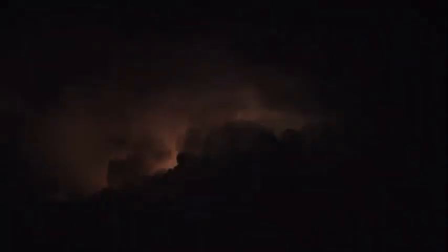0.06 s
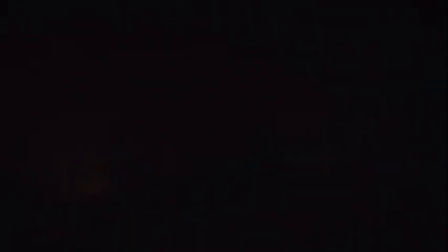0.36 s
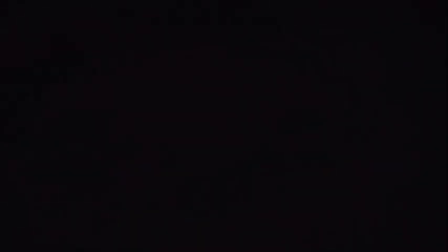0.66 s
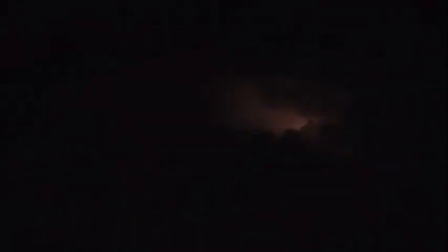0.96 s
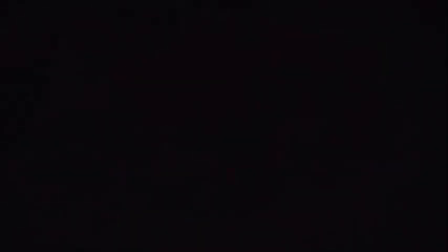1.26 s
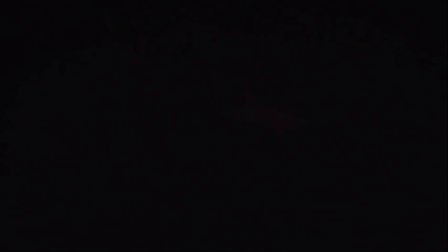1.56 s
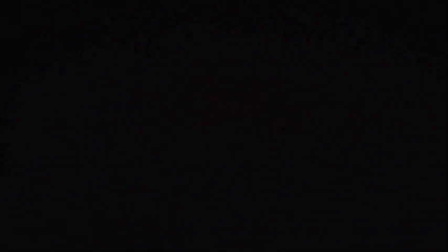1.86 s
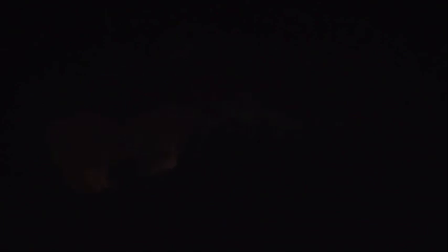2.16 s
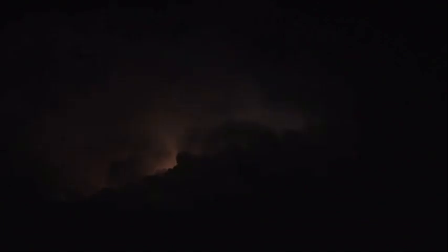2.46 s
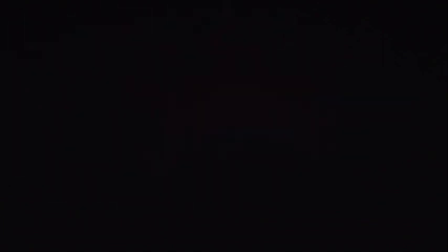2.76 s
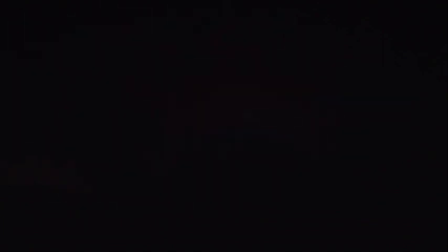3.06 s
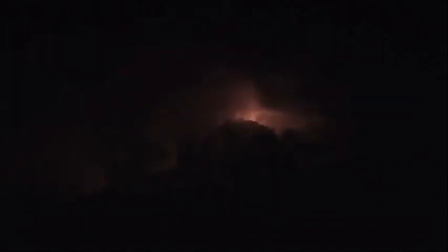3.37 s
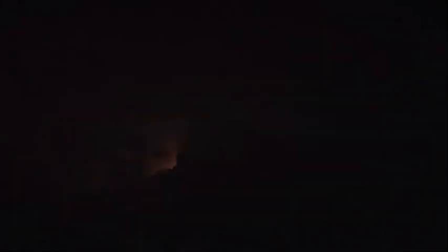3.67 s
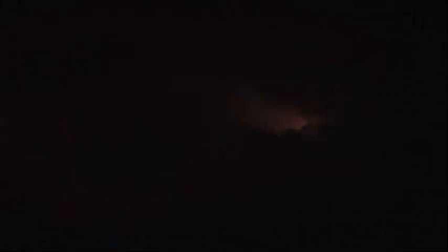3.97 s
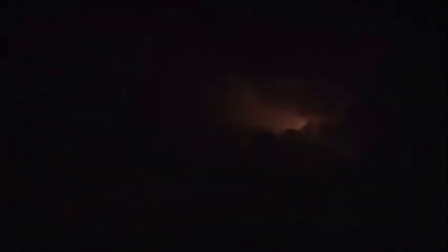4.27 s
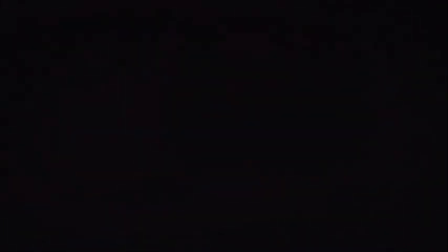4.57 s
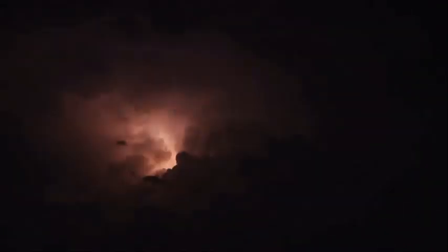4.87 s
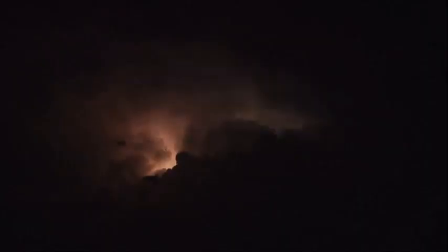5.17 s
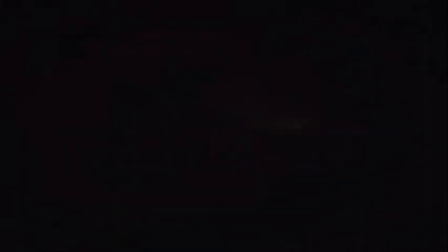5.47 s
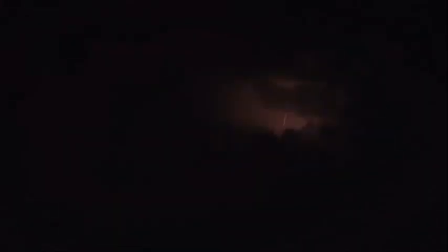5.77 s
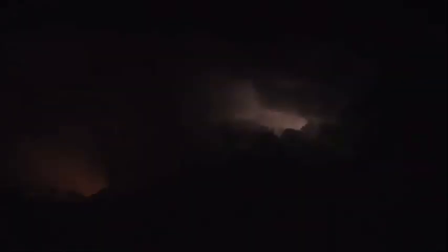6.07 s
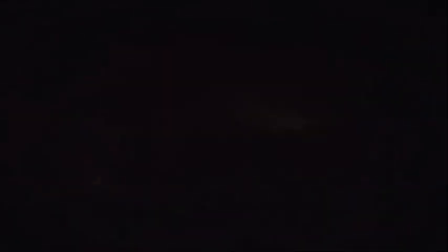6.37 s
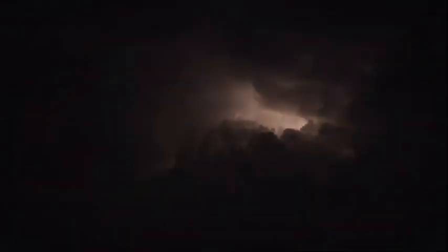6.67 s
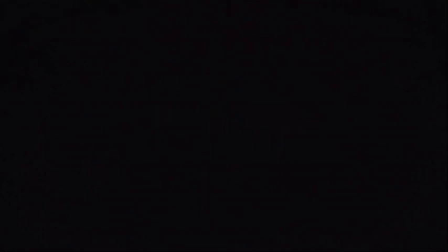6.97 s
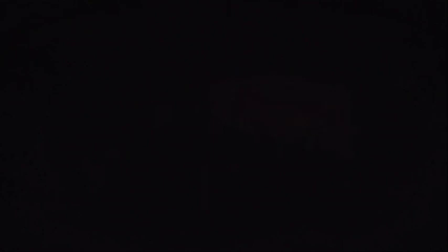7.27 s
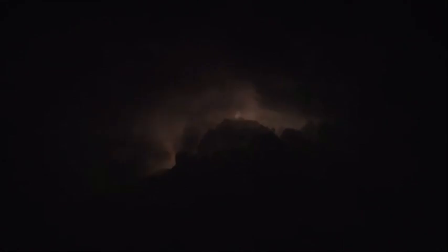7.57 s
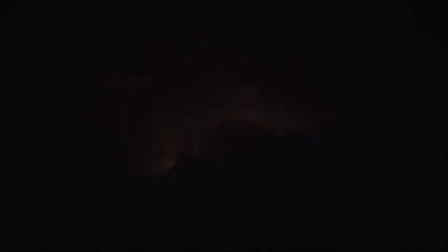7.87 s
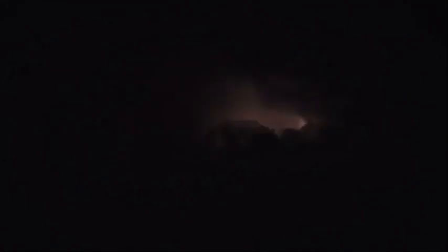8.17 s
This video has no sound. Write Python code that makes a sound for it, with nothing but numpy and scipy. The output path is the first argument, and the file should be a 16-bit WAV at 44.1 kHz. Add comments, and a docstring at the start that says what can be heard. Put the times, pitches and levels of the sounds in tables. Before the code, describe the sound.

Outdoors in a night storm, thunder rumbles low over a soft, gusty hiss of distant rain and wind. About two seconds in, a sudden loud clap slightly overloads the microphone and runs on in heavy booms. The sound cuts out for a moment, with a click at each edge. The thunder returns, swells again and rolls on more quietly, with one small tick near the end.

```python
"""Thunder in a night storm

A low rumble, a sudden clap that overloads the microphone, then a long roll on which peals swell and
fade: shock waves from the lightning channel, dulled by kilometres of air. Behind it lies a gusty wash
of distant rain and wind. The recorder's gain ducks at the clap and creeps back. The sound cuts out
once for a moment, with a click at each edge, and ticks once more near the end."""
import sys
import numpy as np
from scipy import signal
from scipy.fft import rfft, irfft
from scipy.io import wavfile
from scipy.ndimage import uniform_filter1d, minimum_filter1d

SR = 44100
rng = np.random.default_rng(int(sys.argv[2]) if len(sys.argv) > 2 else 0)


def wav_out(sig):
    """Save sig, one row per channel (or a flat mono array), as 16-bit PCM at SR to the path in sys.argv[1]."""
    wavfile.write(sys.argv[1], SR, np.round(np.clip(np.atleast_2d(sig).T, -1, 1) * 32767).astype(np.int16))


N = 371763
TIME = np.arange(N) / SR
FREQS = np.maximum(np.arange(N // 2 + 1) * SR / N, 1)

# how alike left and right are: f/Hz, correlation
STEREO_LIKENESS = [(60, 0.98), (150, 1), (300, 0.96), (520, 0.87), (900, 0.71), (1500, 0.49), (2500, 0.035),
                   (4000, -0.085), (8000, -0.26), (12000, .6)]
# fader of the rain and wind between gusts: t/s, relative level/dB
WASH_FADER = [(0, -52), (0.65, -51.5), (1.6, -49), (2.05, -49), (2.3, -50.5), (3.1, -49), (4.5, -48.5),
              (5.3, -47), (6.5, -46.5), (8.4, -47)]
# gusts and lulls: t/s, lift/dB, half width/s
WASH_GUSTS = [(0.13, 3.5, 0.12), (0.49, 2.7, 0.042), (0.58, -1, 0.03), (0.97, 2, 0.045), (1.5, 1, 0.06),
              (1.725, 2.5, 0.031), (2.11, 3.8, 0.026), (4.5, -2.5, 0.079), (7.53, 1.3, 0.034),
              (7.82, 0.8, 0.055)]
# tone of the wash: f/Hz, relative level/dB
WASH_EQ = [(100, -2.5), (400, 14), (800, 16), (1200, 13), (1600, 9), (2000, 4.5), (2700, 0), (3700, -6.5),
           (5200, -9), (7000, -14.5), (10000, -20), (13000, -23.5), (15500, -30)]
# side the wash comes from: f/Hz, left minus right/dB
WASH_PAN = [(300, -3), (1200, -2), (2200, -2.5), (4000, 0)]
# fine hiss of nearer drops: t/s, treble lift/dB
DROP_SPARKLE = [(0, 1), (2, -0.1), (4.5, 0.9), (5.5, -3), (8.4, -1.5)]
# tone of thunder after kilometres of air: f/Hz, relative level/dB
THUNDER_EQ = [(15, -33), (25, -16), (38, -5), (58, 5.5), (100, -4), (125, 1.5), (215, 0.5), (270, -6),
              (340, -8.5), (420, -11), (680, -17.5), (1000, -27.5), (1200, -36), (1400, -43.5), (2200, -68),
              (4000, -88)]
# fader of the thunder's deep bass: t/s, relative level/dB
BASS_FADER = [(0, -27), (0.9, -31), (1.7, -29), (2.05, -30), (2.11, -20), (2.8, -17.5), (3.05, -20.5),
              (3.45, -17), (3.8, -18.5), (4.3, -21), (4.7, -25.5), (5.05, -19), (5.7, -19), (6.2, -21.5),
              (7, -27.5), (8.4, -27)]
# fader of its body, the roll under the peals: t/s, relative level/dB
BODY_FADER = [(0, -26), (0.78, -24), (1.7, -27.5), (2.06, -26), (2.125, -22), (2.15, -9.5), (2.9, -9.5),
              (3.72, -8), (3.97, -17.5), (4.7, -15), (5.1, -15), (5.8, -12.5), (6.2, -15.5), (7.0, -17),
              (7.5, -20.5), (8.4, -22.5)]
# fader of its growl, the rough upper edge: t/s, relative level/dB
GROWL_FADER = [(0, -35.5), (1.7, -35.5), (2.125, -29), (2.18, -12), (2.33, -10), (2.8, -11.5), (3.3, -12),
               (3.95, -18), (4.6, -17.5), (5.7, -22.5), (6.3, -24.5), (7.2, -25.5), (7.7, -30.5),
               (8.4, -29)]
# peals, one per lightning branch: t/s, length/s, body lift/dB, bass lift/dB, growl lift/dB
BRANCH_PEALS = [(0.17, 0.06, 0.5, 2, -2), (0.27, 0.054, 3, 4, 5), (0.497, 0.033, 3, 4, 8.5),
                (0.603, 0.098, 3.5, 5.5, 1), (0.91, 0.07, -0.5, 0.5, 1), (1.13, 0.12, 2, 4, 0),
                (1.828, 0.088, 2, 2, 6), (2.084, 0.011, 6.5, 3, -4), (2.13, 0.083, 4, 6, -0.5),
                (2.327, 0.071, 4.5, -1.5, -2), (2.438, 0.059, 5, 5.5, 1), (2.574, 0.23, 6, 3, 1.5),
                (2.98, 0.11, 5, 2, 2.5), (3.211, 0.075, 1, 2, 1.5), (3.408, 0.075, 5.5, 6, 3),
                (3.535, 0.069, 1, -3, 0.5), (4.248, 0.03, 6, 4, 3), (4.405, 0.11, 5.5, 4.5, 1.5),
                (4.816, 0.096, 4.5, -0.5, -0.5), (4.928, 0.071, 5.5, 0, 0.5), (5.023, 0.023, 4, 6, 1.5),
                (5.106, 0.046, 3.5, 4.5, 0.5), (5.195, 0.09, 1, 4, -2), (5.421, 0.073, 6, 9, 5.5),
                (5.506, 0.06, 4, 5.5, 3), (5.59, 0.064, 4, 0, 3), (5.868, 0.083, 1.5, 7.5, 2.5),
                (5.994, 0.071, 9.5, 8, 3.5), (6.68, 0.032, -1, 3, 3), (6.77, 0.059, 1.5, 2, 0.5),
                (6.893, 0.026, 1, 2, 4.5), (6.99, 0.094, 1, 2, 1.5), (7.153, 0.04, 3, 6, 1),
                (7.538, 0.023, 2.5, 4.5, 1), (7.789, 0.05, 3.5, -3, 2.5)]
# strong shocks that stand out of the roll: t/s, dry peak level/dB, f/Hz, half width/s
SHOCK_BOOMS = [(0.335, -13, 170, 0.0034), (0.522, -8.5, 169, 0.0035), (0.535, -10.5, 174, 0.0065),
               (0.655, -13.5, 138, 0.0077), (2.142, 5, 206, 0.0076), (2.17, 0, 177, 0.0049),
               (2.186, 0, 210, 0.005), (2.229, 1.5, 170, 0.0099), (2.29, 2.5, 196, 0.0045),
               (2.33, 2, 204, 0.0056), (2.364, 5, 183, 0.0042), (2.464, 3.5, 165, 0.0074),
               (2.611, 5.5, 150, 0.0085), (2.663, 5, 194, 0.0047), (2.722, 4.5, 183, 0.0059),
               (2.786, 5.5, 165, 0.005), (2.823, 4, 152, 0.0057), (3.011, 6, 152, 0.0048),
               (3.05, 4, 190, 0.007), (3.131, 1, 149, 0.0078), (3.229, 4, 224, 0.0038),
               (3.335, 7.5, 144, 0.0092), (3.436, 5.5, 137, 0.0089), (3.479, 2, 150, 0.011),
               (3.634, 4.5, 166, 0.0053), (3.676, 3, 147, 0.008), (3.702, 2.5, 208, 0.0024),
               (3.737, 0, 151, 0.0064), (3.78, 2.5, 213, 0.0016), (3.829, 8, 158, 0.0064),
               (4.269, 1.5, 130, 0.0089), (4.443, 1.5, 170, 0.0051), (4.848, 1.5, 169, 0.0046),
               (4.972, 2.5, 167, 0.0039), (5.044, 3, 145, 0.0043), (5.289, -2, 160, 0.009),
               (5.421, 1.5, 175, 0.0046), (5.443, 0, 197, 0.01), (5.47, 0, 199, 0.018),
               (5.514, 0, 125, 0.006), (5.556, 3.5, 135, 0.005), (5.568, 3.5, 172, 0.0044),
               (5.626, -0.5, 192, 0.006), (5.877, 0.5, 185, 0.005), (5.923, -2.5, 170, 0.0077),
               (6.016, 3.5, 137, 0.009), (6.048, 4.5, 151, 0.015), (6.104, 0.5, 142, 0.0061),
               (6.271, -3, 171, 0.0084), (6.696, -5, 186, 0.0065), (7.081, -4.5, 168, 0.0094),
               (7.196, -5, 219, 0.0036), (7.39, -9, 218, 0.01), (7.848, -8.5, 142, 0.0072)]
# sharp clicks: t/s, step level/dB
CLICK_HITS = [(3.963, -17.5), (4.2634, -9.5), (8.3836, -15)]

WASH_TRIM_DB, BASS_TRIM_DB, BODY_TRIM_DB, GROWL_TRIM_DB = 2, 0.55, 0.45, -1.5
BASS_EDGE_HZ, GROWL_EDGE_HZ, TEAR_EDGE_HZ = 102.5, 344.4, 1130
STEEPENING_DB_PER_DB, STEEPENING_FROM_DB = 0.25, -18
PEAL_ATTACK_S, PEAL_RELEASE_S, BASS_RELEASE_S = 0.039, 0.026, 0.1


def from_db(db):
    """Decibels to gain."""
    return 10 ** (np.asarray(db) / 20)


def over_time(points):
    """An automation curve read at every sample."""
    return np.interp(TIME, *np.transpose(points))


def over_hz(points):
    """A curve read at every frequency, on a log axis."""
    hz, value = np.transpose(points)
    return np.interp(np.log(FREQS), np.log(hz), value)


def below(edge_hz, order=6):
    """Low half of a crossover whose two halves add up in power."""
    return 1 / np.sqrt(1 + (FREQS / edge_hz) ** (2 * order))


def above(edge_hz):
    """High half of the same crossover."""
    return np.sqrt(1 - below(edge_hz) ** 2)


def smoothed(x, span_s, mode="reflect"):
    """Rounds off a control signal with two moving averages."""
    size = int(span_s * SR)
    return uniform_filter1d(uniform_filter1d(x, size, mode=mode), size, mode=mode)


def wavering(span_s):
    """A slow random wobble with a spread of 1."""
    slow = smoothed(rng.standard_normal(N), span_s, mode="wrap")
    return slow / slow.std()


def evened(x, span_s):
    """Holds the running rms at 1 and keeps the faster flutter."""
    power = smoothed(x.mean(0) ** 2, span_s)
    return x / np.sqrt(np.maximum(power, 1e-20))


def arrivals(per_s, spread_db):
    """Two trains of randomly timed pulses of uneven size and either sign."""
    hits = rng.random((2, N)) < per_s / SR
    signs = rng.choice([-1, 1], (2, N))
    return hits * signs * from_db(spread_db * rng.standard_normal((2, N)))


def at_microphones(pair, eq):
    """Colours two unrelated signals into left and right: long waves reach both microphones alike."""
    alike = np.clip(over_hz(STEREO_LIKENESS), -.99, .998)
    mid, side = rfft(pair) * eq
    side = side * np.sqrt((1 - alike) / (1 + alike))
    return irfft(np.array([mid + side, mid - side]), N)


def wash(flutter_db):
    """Countless far drops and rustling leaves merge into a soft, wide hiss that swells in gusts."""
    gusts_db = sum(db * np.exp(-((TIME - t) / width_s) ** 2) for t, db, width_s in WASH_GUSTS)
    level_db = over_time(WASH_FADER) + gusts_db + flutter_db * wavering(span_s=0.042)
    drops = arrivals(per_s=14000, spread_db=2.5)
    patter = at_microphones(drops, from_db(over_hz(WASH_EQ)))
    panned = rfft(patter) * from_db(over_hz(WASH_PAN) * [[.5], [-.5]])
    sparkle = irfft(panned * above(edge_hz=3900), N)
    hiss = irfft(panned, N) + sparkle * (from_db(over_time(DROP_SPARKLE)) - 1)
    # the fader sets the level of the treble, where the thunder does not reach
    treble = irfft(panned * above(edge_hz=2500), N)
    return hiss / treble.mean(0).std() * from_db(level_db + WASH_TRIM_DB)


def thunder():
    """Every kink of the lightning channel sends a shock; they overlap into a roll, dulled by the air."""
    body_lift, _, growl_lift = peal_lifts(PEAL_RELEASE_S)
    _, bass_lift, _ = peal_lifts(BASS_RELEASE_S)  # the bass of a peal lingers
    bass_db = over_time(BASS_FADER) + bass_lift
    body_db = over_time(BODY_FADER) + body_lift
    growl_db = over_time(GROWL_FADER) + growl_lift
    shocks = arrivals(per_s=2400, spread_db=2.0)
    air = from_db(over_hz(THUNDER_EQ))
    bass = evened(at_microphones(shocks, air * below(BASS_EDGE_HZ)), span_s=0.16)
    body = evened(at_microphones(shocks, air * above(BASS_EDGE_HZ) * below(GROWL_EDGE_HZ)), span_s=0.034)
    # the nearer parts of the channel keep more of their upper range
    growl = evened(at_microphones(shocks, air * above(GROWL_EDGE_HZ)), span_s=0.35)
    # strong shocks have steeper fronts, so a loud growl tears at the top
    tear = irfft(rfft(growl) * above(TEAR_EDGE_HZ), N)
    tear_db = STEEPENING_DB_PER_DB * np.maximum(growl_db - STEEPENING_FROM_DB, 0)
    growl = growl + tear * (from_db(tear_db) - 1)
    booming = with_booms(body * from_db(body_db + BODY_TRIM_DB))
    return bass * from_db(bass_db + BASS_TRIM_DB) + booming + growl * from_db(growl_db + GROWL_TRIM_DB)


def peal_lifts(release_s):
    """Each branch's peal rises quickly, holds and fades: its lift in dB for body, bass and growl."""
    lifts = np.zeros((3, N))
    for t, length_s, *lift_db in BRANCH_PEALS:
        corners = [t - PEAL_ATTACK_S / 2, t + PEAL_ATTACK_S / 2, t + length_s, t + length_s + release_s]
        during = slice(*np.searchsorted(TIME, [corners[0], corners[-1]]))
        envelope = np.interp(TIME[during], corners, [0, 1, 1, 0])
        lifts[:, during] = np.maximum(lifts[:, during], np.outer(lift_db, envelope))
    return lifts


def with_booms(roll):
    """A strong shock, rounded to a few swings of pressure, briefly takes over from the roll."""
    out = roll.copy()
    for t, peak_db, hz, width_s in SHOCK_BOOMS:
        near = slice(*np.searchsorted(TIME, [t - .05, t + .05]))
        offset_s = TIME[near] - t
        swell = np.exp(-(offset_s / width_s) ** 2)
        swings = np.sin(2 * np.pi * hz * offset_s + rng.uniform(0, 2 * np.pi))
        out[:, near] = out[:, near] * (1 - swell) + from_db(peak_db) * swell * swings
    return out


def gain_control(x, threshold_db, window_s, attack_s, recovery_db_per_s):
    """The recorder ducks quickly when the level passes the threshold, then creeps back up."""
    power = uniform_filter1d(x.mean(0) ** 2, int(window_s * SR))
    excess_db = np.maximum(10 * np.log10(np.maximum(power, 1e-12)) - threshold_db, 0)
    creep_db = recovery_db_per_s * TIME
    held_db = np.maximum.accumulate(excess_db + creep_db) - creep_db
    pole = np.exp(-1 / (attack_s * SR))
    duck_db = signal.lfilter([1 - pole], [1, -pole], held_db)
    return x * from_db(-duck_db)


def limiter(x, span_s, overshoot_db):
    """Rides the gain round the loudest swings; the tips that overshoot clip and crackle faintly."""
    safe_gain = 1 / np.maximum(np.abs(x).max(0) / from_db(overshoot_db), 1)
    held_gain = minimum_filter1d(safe_gain, 2 * int(span_s * SR))
    return np.clip(x * smoothed(held_gain, span_s), -1, 1)


def dropout(x, from_s, to_s):
    """The sound cuts out for a moment, with a very short fade at each edge."""
    gate = 1.0 * ((TIME < from_s) | (TIME > to_s))
    return x * uniform_filter1d(gate, size=40)


def clicks(decay_s):
    """Each click is a step in the signal that relaxes quickly."""
    return sum(from_db(db) * (TIME >= t) * np.exp(-np.abs(TIME - t) / decay_s) for t, db in CLICK_HITS)


def scene():
    """Thunder over a bed of distant rain and wind."""
    return thunder() + wash(flutter_db=0.4)


def record(dry):
    """The gain ducks, the loudest swings still overload, the sound drops out once, and the top is cut."""
    ducked = gain_control(dry, threshold_db=-5, window_s=0.026, attack_s=0.033, recovery_db_per_s=0.88)
    limited = limiter(ducked, span_s=0.0007, overshoot_db=0.7)
    broken = dropout(limited, from_s=3.9633, to_s=4.2633) + clicks(decay_s=0.0032)
    high_cut = signal.ellip(10, .1, 80, 15200, fs=SR, output="sos")  # brick wall at 15.2 kHz
    return signal.sosfilt(high_cut, broken)


dry = scene()
out = record(dry)
wav_out(out)
```